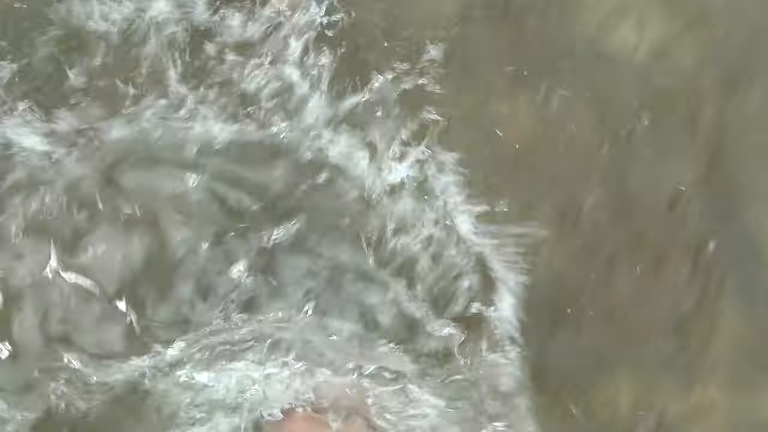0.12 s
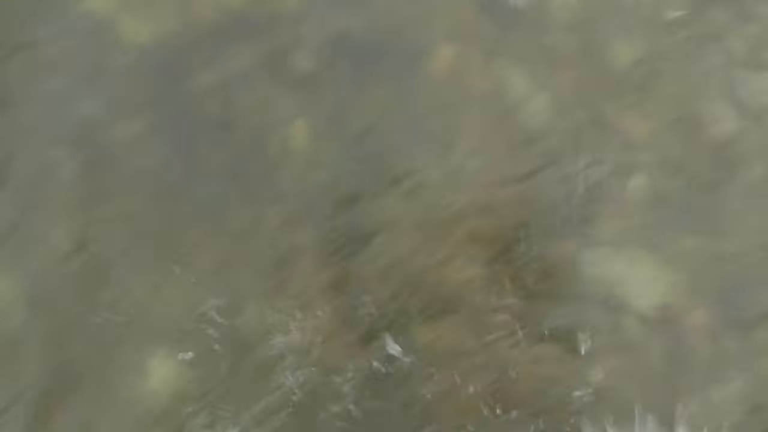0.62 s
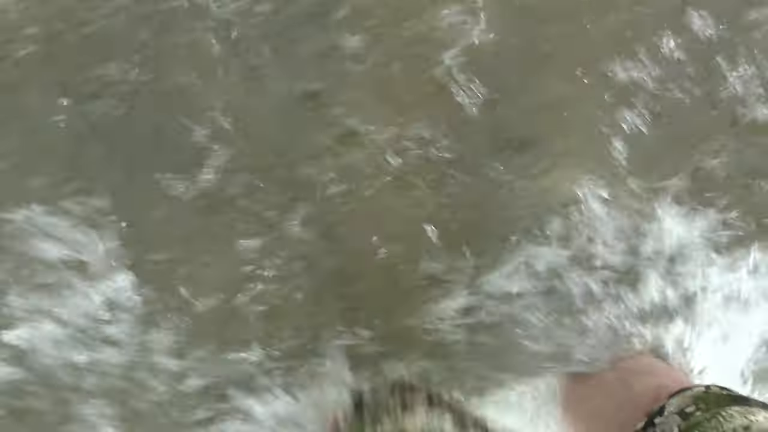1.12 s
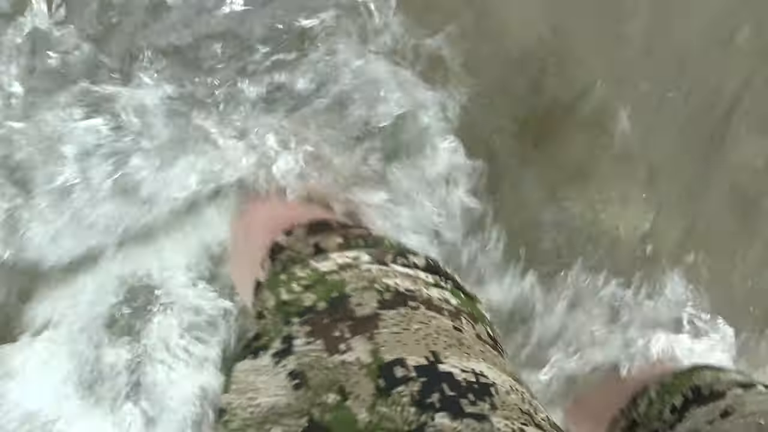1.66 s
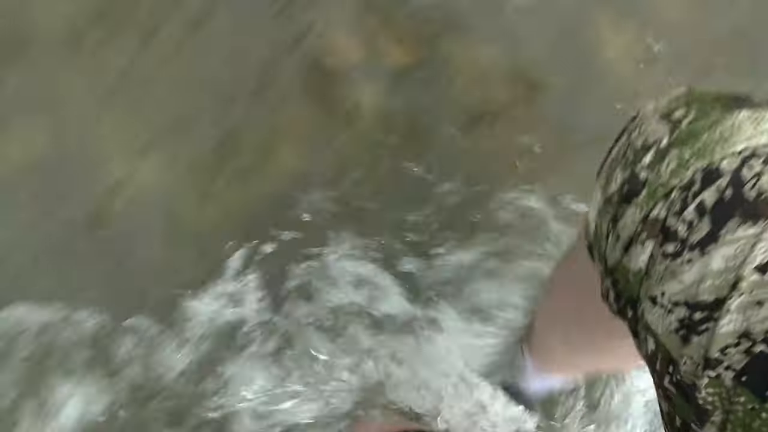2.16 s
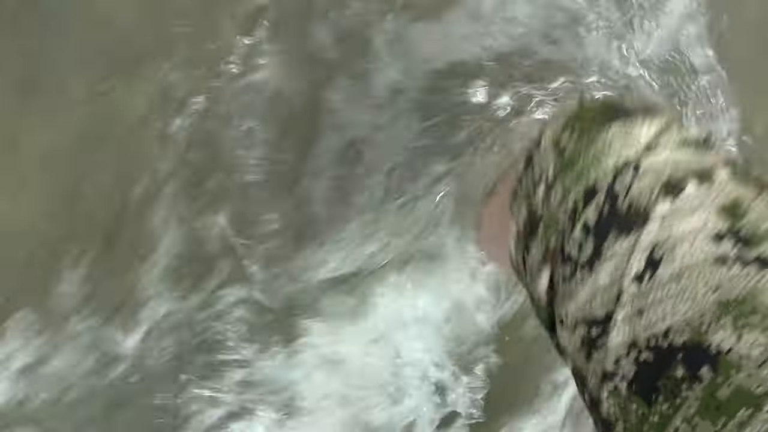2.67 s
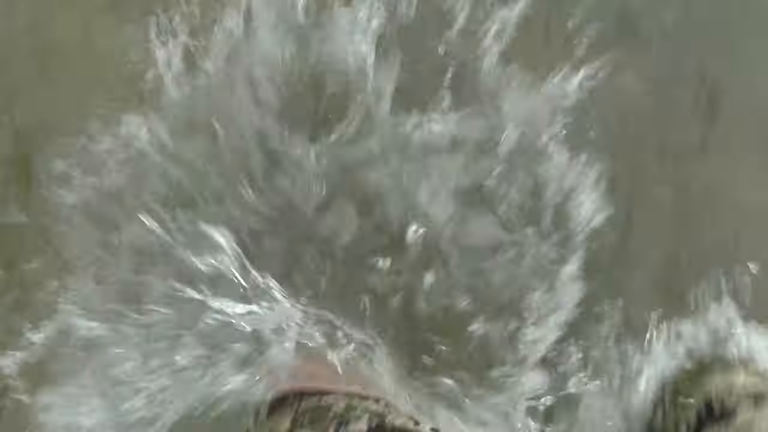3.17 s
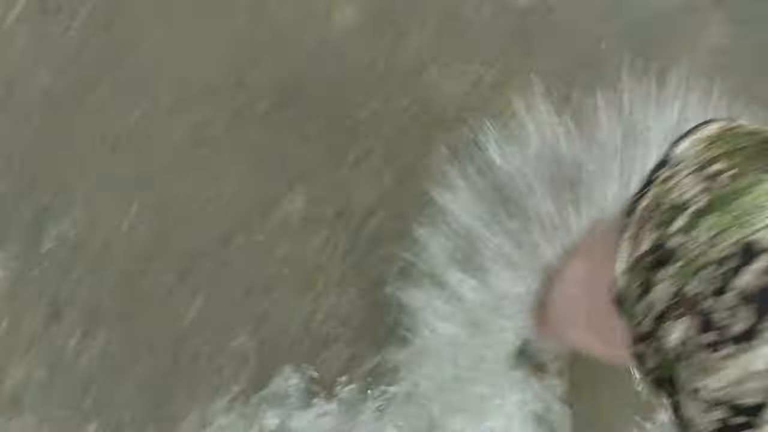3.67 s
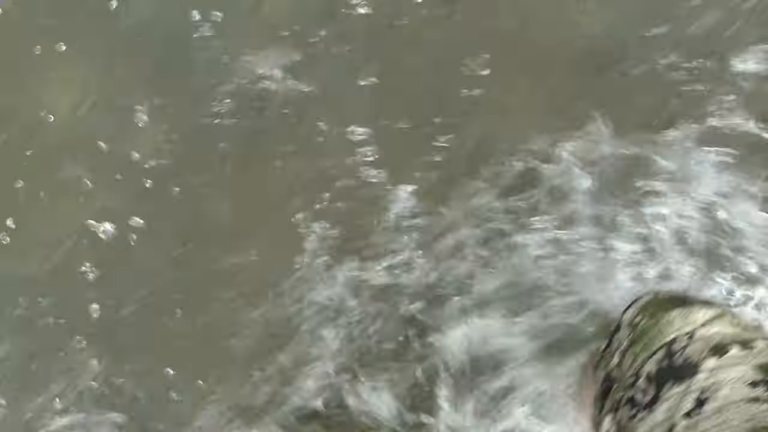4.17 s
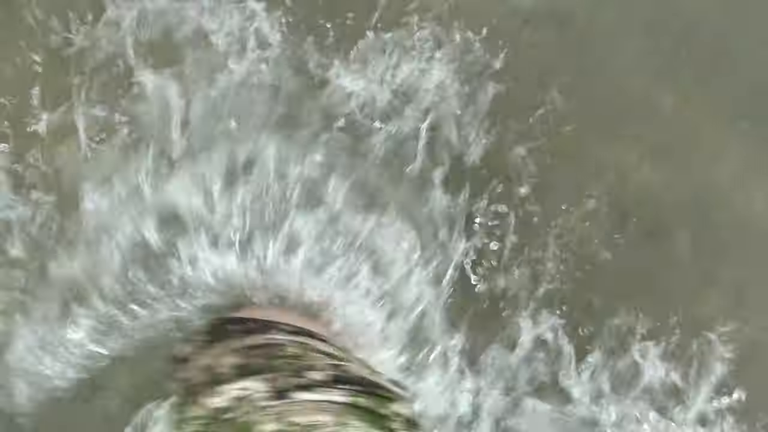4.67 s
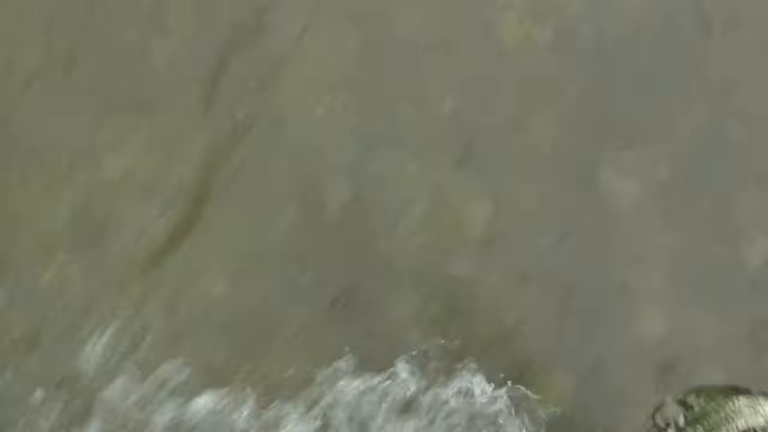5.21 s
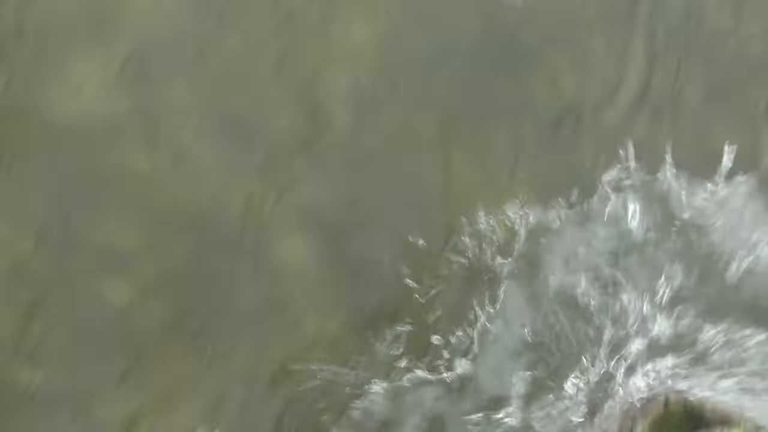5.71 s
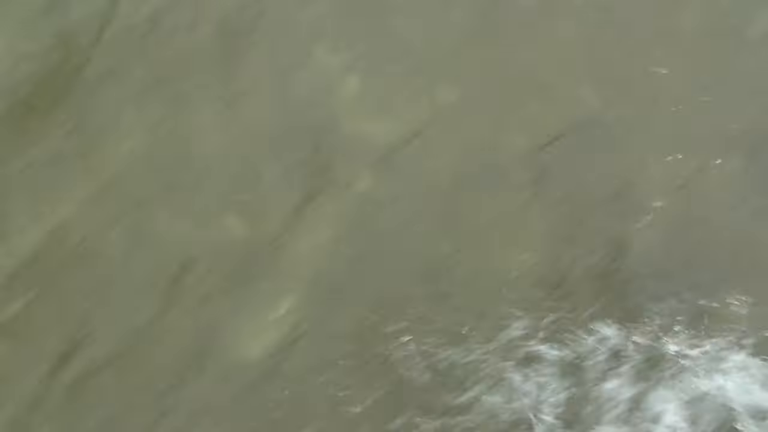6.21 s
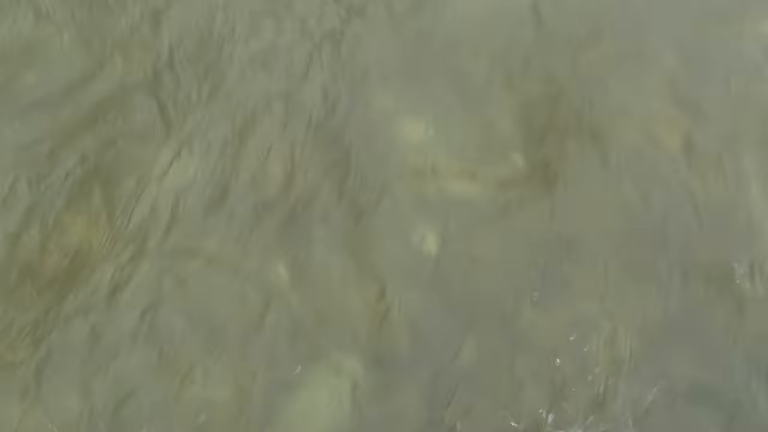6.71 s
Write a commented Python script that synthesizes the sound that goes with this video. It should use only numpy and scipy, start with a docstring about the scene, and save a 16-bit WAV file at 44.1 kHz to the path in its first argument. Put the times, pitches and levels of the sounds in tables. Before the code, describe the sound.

Outdoors in a creek, a person wades quickly. Each stride pushes up a foamy surge with hissing spray and low slosh, then sheets of water slap down. Hollow bubbles plop and gurgle, and near drops tick sharply. Deep wind thumps overload a small bare microphone held just above the legs. Churning grows denser in the later part, then fades, leaving a faint low hum.

```python
"""In a knee-deep creek someone wades fast, heard from a small bare microphone held above the legs.
Each stride churns up bubbles and throws spray: noise and clouds of tiny fading tones, swelling in surges.
Sheets of water slap down, big bubbles plop and gurgle, and near drops tick, all as short fading tones or bursts.
Wind buffets the microphone: filtered noise makes a deep rumble, flattened near the top of the range.
A faint steady tone joins near the end, as water and wind flutter fade out."""
import sys
import numpy as np
from scipy import signal
from scipy.fft import rfft, irfft, next_fast_len
from scipy.io import wavfile
from scipy.ndimage import uniform_filter1d, map_coordinates

SR = 44100
rng = np.random.default_rng(int(sys.argv[2]) if len(sys.argv) > 2 else 0)


def magnitude_from_level(level_db):
    """Linear magnitude for a level in decibels (20 dB per decade)."""
    exponent = np.asarray(level_db, float) / 20
    return 10 ** exponent


def pcm_store(signal):
    """Save signal as 16-bit PCM."""
    levels = np.round(np.clip(np.atleast_2d(signal), -1, 1) * 32767)
    wavfile.write(sys.argv[1], SR, levels.astype(np.int16).T)


N = 301644  # samples in the scene

# Surges of water as a leg ploughs on: (start [s], length [s], churn [dB], spray [dB], slosh [dB])
SURGE_EVENTS = [(0, 0.063, -23, -28, -27), (0.068, 0.11, -20, -24, -32), (0.235, 0.16, -32, -36, -52),
                (0.297, 0.19, -26.5, -33.5, -52), (0.555, 0.043, -30.5, -39, -31),
                (0.689, 0.12, -27, -34.5, -24.5), (0.953, 0.037, -27.5, -33.5, -38),
                (1.066, 0.26, -29, -33.5, -38), (1.414, 0.096, -31.5, -42, -49),
                (1.62, 0.13, -34, -40, -55), (1.79, 0.21, -30.5, -40.5, -62),
                (2.161, 0.15, -25.5, -39, -34), (2.413, 0.15, -25, -37.5, -25.5),
                (2.657, 0.058, -32, -64, -28.5), (2.893, 0.079, -35, -60, -49),
                (2.967, 0.063, -24.5, -37.5, -20), (3.075, 0.19, -33, -45, -25),
                (3.278, 0.027, -29, -33.5, -49), (3.451, 0.072, -34.5, -31.5, -28.5),
                (3.601, 0.072, -29, -37.5, -47), (3.702, 0.11, -26, -36, -25.5),
                (3.907, 0.12, -32, -39, -27), (4.057, 0.23, -30, -36, -35), (4.186, 0.3, -27.5, -32, -27),
                (4.557, 0.081, -31, -37, -33), (4.81, 0.14, -24, -31.5, -27.5),
                (5.004, 0.16, -24.5, -33, -40), (5.327, 0.16, -28.5, -33.5, -30),
                (5.536, 0.13, -24.5, -34.5, -24), (5.667, 0.087, -22.5, -30.5, -22),
                (5.79, 0.15, -26, -32.5, -25), (5.967, 0.19, -35, -34, -30),
                (6.211, 0.22, -30, -30.5, -32.5), (6.505, 0.048, -31.5, -30, -48),
                (6.598, 0.18, -35, -34, -38.5)]
# How fast each part dies after a surge: (churn [s], spray [s], slosh [s])
SURGE_FALL = (0.049, 0.049, 0.12)
# Water running off between surges: (churn [dB], spray [dB], slosh [dB])
TRICKLE = (-33.5, -43, -47)
# Sheets of water slapping down: (time [s], level [dB], fade [s])
SLAP_EVENTS = [(0.205, -24, 0.019), (0.337, -27, 0.03), (0.447, -23, 0.084), (1.623, -27, 0.047),
               (1.793, -25.5, 0.0091), (2.17, -30, 0.011), (2.376, -35, 0.047), (2.977, -34, 0.03),
               (3.099, -23.5, 0.033), (3.152, -22, 0.016), (3.227, -27.5, 0.039), (3.506, -25.5, 0.11),
               (3.636, -21, 0.041), (3.683, -16.5, 0.013), (3.787, -22, 0.022), (3.952, -20, 0.035),
               (4.309, -22.5, 0.035), (4.353, -20.5, 0.016), (4.83, -29.5, 0.17), (4.991, -20, 0.018),
               (5.07, -22.5, 0.04), (5.41, -21.5, 0.065), (5.627, -20.5, 0.028), (5.684, -25.5, 0.1),
               (5.81, -23, 0.018), (6.133, -28, 0.0075), (6.258, -23.5, 0.043), (6.41, -26, 0.023),
               (6.498, -29, 0.023)]
# Tone balance of the churned foam: (frequency [Hz], relative level per Hz [dB])
CHURN_SPECTRUM = [(190, -6), (330, 1), (664, 1.5), (1550, -2.5), (2040, -6.5), (2920, -5.5), (3600, -15),
                  (4680, -48), (7920, -120)]
# Tone balance of the spray: (frequency [Hz], relative level per Hz [dB])
SPRAY_SPECTRUM = [(2000, -5.5), (3400, -5.5), (5270, -4.5), (8000, -7), (10000, -11), (12000, -15),
                  (14000, -24), (15700, -33), (16500, -110)]
# Tone balance of the displaced water: (frequency [Hz], relative level per Hz [dB])
SLOSH_SPECTRUM = [(100, 18), (170, 11), (350, 2.5), (500, -40)]
# How much of the spray is dulled: (time [s], share [0-1])
SPRAY_DULLNESS = [(0, 0.45), (2.4, 0.16), (5.3, 0.31), (6.4, 0.57), (6.84, 0.7)]
# Big bubbles: (time [s], level [dB], pitch [Hz], life [cycles], pitch rise over a life [share])
PLOP_EVENTS = [(0.204, -7.5, 682, 12.3, 0), (0.445, -10.5, 1160, 12, 0.02), (1.421, -14.5, 337, 7, 0.03),
               (2.304, -6.5, 1150, 7.3, 0.06), (2.976, -14, 630, 8.4, 0), (3.145, -10, 273, 4.3, 0.39),
               (3.949, -3.5, 420, 3.5, 0), (4.696, -10.5, 510, 6.6, 0.35), (5.073, -15.5, 304, 14, 0.16),
               (5.181, -7.5, 258, 4.1, 0.05), (5.404, -15, 500, 11, 0), (3.148, -11, 796, 8.5, 0.23),
               (6.27, -15, 820, 11, 0.01), (6.5, -20, 395, 12, 0)]
# Strings of bubbles from trapped air: (start [s], length [s], level [dB], pitch [Hz])
GURGLE_EVENTS = [(1.45, 0.065, -18.5, 360), (3.085, .16, -14, 199), (5.68, 0.12, -13, 294)]
# Near drops landing: (time [s], ring level [dB], crisp edge level [dB])
DROP_EVENTS = [(0.364, -28, -14.5), (0.841, -29, -24), (1.2022, -17, -20), (1.799, -18, -34),
               (1.8198, -38, -22), (3.012, -41, -15), (3.509, -18, -11), (3.5182, -10, -6),
               (3.6343, -16, -26), (3.95, -27, -21), (4.229, -20, -28), (4.458, -19, -29),
               (5.441, -36, -24), (5.873, -39, -20), (6.021, -17, -30), (6.139, -11, -32),
               (6.2756, -34, -23)]
# Strength of the slow wind heaves: (time [s], level [dB])
HEAVE_LEVEL = [(0.0, -11), (0.23, -7.5), (0.32, -9.5), (0.89, -5.5), (1.37, -12.5), (1.52, -3.5),
               (1.92, -18), (2.06, -7), (4.1, -11.5), (4.28, -17.5), (4.61, -7), (4.73, -19.5), (5.2, -2),
               (5.35, -11), (6.42, -6.5), (6.84, -22)]
# Tone balance of the heaves: (frequency [Hz], relative level per Hz [dB])
HEAVE_SPECTRUM = [(1.8, -104), (3.0, 9.5), (16, -1.5), (26, -3), (40, -10.5), (62, -32), (120, -120)]
# Strength of the faster wind flutter: (time [s], level [dB])
FLUTTER_LEVEL = [(0.0, -21.5), (0.5, -17), (0.53, -29.5), (1.69, -19.5), (1.95, -26), (2.13, -17),
                 (2.27, -13), (2.36, -22), (2.44, -7), (2.55, -16), (2.65, -19), (2.72, -11), (3.35, -22.5),
                 (4.1, -13.5), (4.19, -10.5), (4.8, -43), (5.12, -21), (5.26, -30.5), (5.49, -14.5),
                 (5.75, -20.5), (6.1, -6), (6.13, -14), (6.55, -19), (6.61, -30), (6.84, -25)]
# Tone balance of the flutter, before its lumps: (frequency [Hz], relative level per Hz [dB])
FLUTTER_SPECTRUM = [(16, -73), (28, 3), (69, -0.5), (190, -23.5), (250, -86), (420, -120)]
# Faint tone near the end: (time [s], pitch [Hz], rms level [dB])
HUM_TRACK = [(6.4, 155, -60), (6.55, 159, -40), (6.84, 155, -51.5)]
# Brief dips in level: (time [s], half width [s], depth [dB])
LEVEL_DIPS = [(0.931, 0.026, 3), (2.154, 0.0076, 8.5), (2.36, 0.023, 6), (2.626, 0.049, 20.5),
              (2.849, 0.03, 7.5), (4.54, 0.017, 4.5), (4.755, 0.036, 5)]


def unit(x):
    """Scale a sound to an average (rms) level of 1."""
    return x / np.sqrt(np.mean(x ** 2) + 1e-20)


def curves(rows):
    """Draw straight lines between table rows: one value per sample for each column after the time."""
    s, *columns = np.transpose(rows)
    t = np.arange(N) / SR
    return [np.interp(t, s, column) for column in columns]


def wobble(rate):
    """Draw a smooth random curve with rate random points a second."""
    knots = rng.standard_normal(int(N * 200 / SR) + 4)
    return map_coordinates(knots, [np.arange(N) * rate / SR])


def shaped(x, spectrum):
    """Even out a sound's own tone balance, then give it the listed one, at rms 1."""
    z = rfft(x, next_fast_len(N + SR // 2))
    hz = np.fft.rfftfreq(2 * len(z) - 2, 1 / SR)
    own = np.sqrt(np.abs(uniform_filter1d(np.abs(z) ** 2, size=2000))) + 1e-9
    f, db = np.transpose(spectrum)
    wanted = magnitude_from_level(np.interp(np.log(hz + 0.11), np.log(f), db))
    return unit(irfft(z / own * wanted)[:N])


def patchy(depth_db):
    """Make noise whose gain varies in small patches of time and pitch."""
    z = signal.stft(rng.standard_normal(N + 512), nperseg=512)[2]
    field = rng.standard_normal(z.shape)
    field = uniform_filter1d(field, size=6, axis=0)  # spread across pitch
    field = uniform_filter1d(field, size=5, axis=1)  # spread across time
    patches = z * magnitude_from_level(depth_db * unit(field))
    return unit(signal.istft(patches, nperseg=512)[1][:N])


def bubbles(s, gain, hz, cycles, rise, size, onset=0.11):
    """Add fading tones that swell over onset cycles; the pitch climbs as each bubble nears the surface."""
    t = np.arange(size) / SR
    turns = hz[:, None] * t
    life = turns / np.reshape(cycles, (-1, 1))
    tone = np.sin(2 * np.pi * turns * (1 + rise * life / 2))
    wave = tone * np.exp(-life * 2) * (1 - np.exp(-turns / onset))
    where = np.round(s * SR).astype(int)[:, None] + np.arange(size)
    return np.bincount(where.ravel(), (gain[:, None] * wave).ravel(), N + size)[:N]


def cloud(hz, octaves, cycles, spread_db, count, size):
    """Scatter bubbles at random moments and pitches, a few louder than the rest, at rms 1."""
    s = rng.random(count) * (N - 1) / SR
    loudness = np.minimum(rng.exponential(size=count), 5)
    pitch = np.clip(hz * 2 ** (octaves * rng.standard_normal(count)), 200, 15000)
    return unit(bubbles(s, magnitude_from_level(spread_db * loudness), pitch, cycles, 0.354, size))


def water():
    """Churned foam sings in the middle range, displaced water sloshes below, spray crackles above."""
    plough, thrown, pushed = surges()
    churn = np.hypot(plough, slaps())
    quick = churn / plough  # lets spray and slosh follow the slaps
    slosh = pushed * quick ** 0.69 * shaped(slosh_texture(), SLOSH_SPECTRUM)
    mix = churn * shaped(foam_texture(), CHURN_SPECTRUM) + spray(thrown, quick) + slosh
    unevenness_db = 0.6 * wobble(18) + 1.2 * wobble(40)
    return magnitude_from_level(unevenness_db) * mix


def surges():
    """Gain of churn, spray and slosh: every surge rises fast, sags while it lasts and drains away."""
    rise_s, rise_share, sag_db_per_s = 0.01, 0.05, 12  # the rise also grows with the surge's length
    t = np.arange(N) / SR
    power = magnitude_from_level(np.reshape(TRICKLE, (-1, 1))) ** 2 * np.ones(N)
    fall = np.reshape(SURGE_FALL, (-1, 1))
    for s, length, *db in SURGE_EVENTS:
        part = slice(round(s * SR), round((s + length) * SR) + SR // 3)
        age = t[part] - s
        risen = np.abs(age + (s == 0))  # a surge at time zero is already under way
        rise = 1 - np.exp(-risen / (rise_s + rise_share * length))
        sag = magnitude_from_level(-sag_db_per_s * (age - length / 2))
        drain = np.exp(-np.clip(age - length, 0, None) / fall)
        power[:, part] += (magnitude_from_level(np.reshape(db, (-1, 1))) * rise * sag * drain) ** 2
    return np.sqrt(power)


def slaps():
    """Gain of water sheets slapping down: a quick rise, then each one's own fade."""
    t = np.arange(N) / SR
    power = np.zeros(N)
    for s, db, fade in SLAP_EVENTS:
        age = np.clip(t - s, 0, None)
        rise = 1 - np.exp(-age / 0.0022)
        power += (magnitude_from_level(db) * rise * np.exp(-(age / fade) ** 2)) ** 2
    return np.sqrt(power)


def foam_texture():
    """Foam is rushing noise plus many small bubbles and fewer droplets that ring longer."""
    small = cloud(1200, 1.1, 4, spread_db=1.7, count=12000, size=400)
    droplets = cloud(2200, 0.8, 10, spread_db=1.8, count=1500, size=800)
    return patchy(depth_db=1) + 0.65 * small + 0.25 * droplets


def slosh_texture():
    """Displaced water is noise plus low, slow bubbles."""
    low = cloud(280, 0.4, 4.5, spread_db=1.6, count=900, size=2000)
    return patchy(depth_db=1.8) + 0.9 * low


def spray(thrown, quick):
    """Spray lands in flurries of fine mist; hard splashes throw crisp fine drops."""
    fine = cloud(9000, 0.6, 2.5, spread_db=2.4, count=14000, size=100)
    mist = patchy(depth_db=1.1) + 0.7 * fine
    ticks = cloud(9500, 0.4, 8, spread_db=2.8, count=2500, size=120)
    flurries = thrown * magnitude_from_level(1.5 * wobble(45))
    bright = flurries * quick ** 0.95 * shaped(mist, SPRAY_SPECTRUM)
    bright += magnitude_from_level(-2.5) * flurries ** 1.4 * quick ** 1.2 * ticks
    soft = signal.lfilter(*signal.butter(2, 6000, fs=SR), bright)  # without its top
    return bright + curves(SPRAY_DULLNESS)[0] * (soft - bright)


def plops():
    """Large air pockets burst with a short note, often rising."""
    s, db, hz, cycles, rise = np.transpose(PLOP_EVENTS)
    return bubbles(s, magnitude_from_level(db), hz, cycles, rise[:, None], size=6000, onset=2.2)


def gurgles(count=4):
    """Trapped air lets go a few bubbles of near pitch at uneven steps."""
    start, length, db, hz = np.transpose(GURGLE_EVENTS)[..., None]
    shape = (len(GURGLE_EVENTS), count)
    s = start + length * (np.arange(count) + rng.random(shape) / 2) / count
    gain = magnitude_from_level(db + 2 * rng.standard_normal(shape))
    pitch = hz * (1 + 0.15 * rng.standard_normal(shape))
    return bubbles(s.ravel(), gain.ravel(), pitch.ravel(), 4.5, 0.3, size=3000, onset=1.2)


def drops():
    """Single drops tick: a short ring, a brighter overtone and a crisp edge."""
    s, db, edge_db = np.transpose(DROP_EVENTS)
    hz = 2770 * (1 + 0.05 * rng.standard_normal(len(s)))
    ring = bubbles(s, magnitude_from_level(db), hz, 10, 0.15, size=300, onset=1.2)
    overtone = bubbles(s, magnitude_from_level(db - 7), 2.0 * hz, 6.1, 0.21, size=300, onset=1.2)
    edge = bubbles(s, magnitude_from_level(edge_db), 3.35 * hz, 4.4, 0.1, size=300, onset=0.33)
    return ring + overtone + edge


def wind(quiet):
    """Slow pressure heaves and faster, lumpier eddies; the diaphragm stiffens at the tallest pushes."""
    (heave_db,), (flutter_db,) = curves(HEAVE_LEVEL), curves(FLUTTER_LEVEL)
    # the slow heave only partly follows the dips
    heave = quiet ** 0.15 * magnitude_from_level(heave_db) * shaped(rng.standard_normal(N), HEAVE_SPECTRUM)
    lumps = magnitude_from_level(3.4 * wobble(11) + 1.6 * wobble(4.6))
    eddies = unit(lumps * shaped(rng.standard_normal(N), FLUTTER_SPECTRUM))
    push = heave + quiet * magnitude_from_level(flutter_db) * eddies
    top, hardness = 0.75, 3.1  # highest level reached, and how sharply it flattens there
    return push / (1 + np.abs(push / top) ** hardness) ** (1 / hardness)


def hum():
    """A thin steady tone is one sine whose pitch and level drift slowly."""
    hz, db = curves(HUM_TRACK)
    on = np.arange(N) / SR > HUM_TRACK[0][0]
    return on * np.sqrt(2) * magnitude_from_level(db) * np.sin(2 * np.pi * np.cumsum(hz) / SR)


def dips():
    """Gain of the brief dips in level and of the fade of water and wind flutter at the end."""
    fade_from_s, fade_db_per_s = 6.588, 43
    t = np.arange(N) / SR
    loss_db = fade_db_per_s * np.clip(t - fade_from_s, 0, None)
    for s, half, db in LEVEL_DIPS:
        loss_db += db * np.exp(-((t - s) / half) ** 6)
    return magnitude_from_level(-loss_db)


def scene():
    """Mix the water and the wind into one channel."""
    quiet = dips()
    mix = quiet * water() + plops() + gurgles() + drops() + wind(quiet) + hum()
    return mix[None]


def roll_off(x):
    """The treble ends steeply here."""
    return signal.sosfilt(signal.butter(12, 15690, fs=SR, output="sos"), x)


def record(dry):
    """Turn the finished mix into the sound to be saved."""
    return roll_off(dry)


dry = scene()
out = record(dry)
pcm_store(out)
```